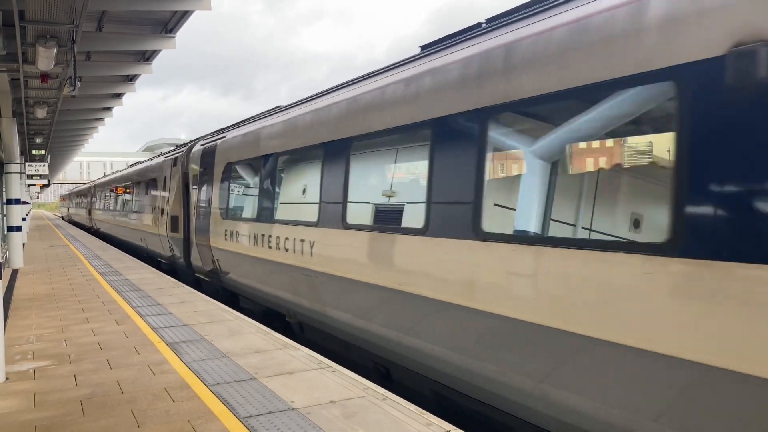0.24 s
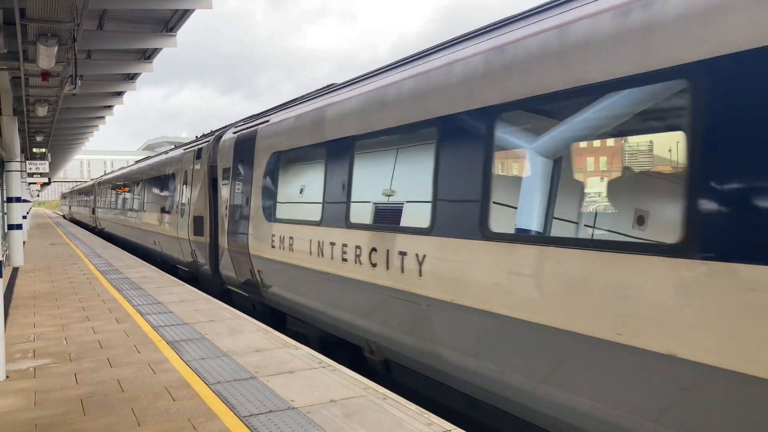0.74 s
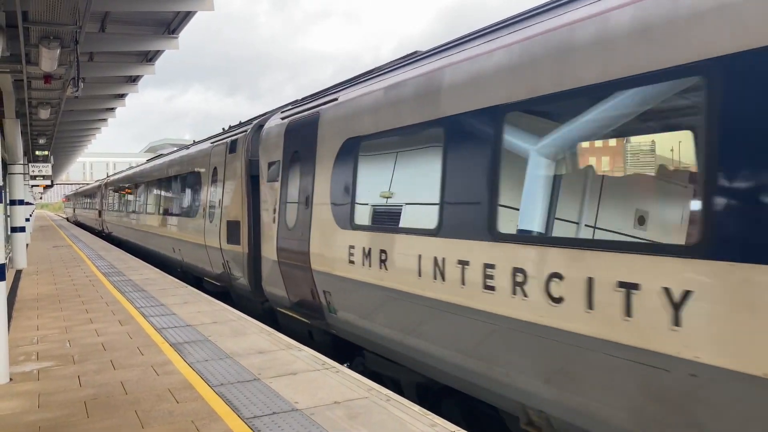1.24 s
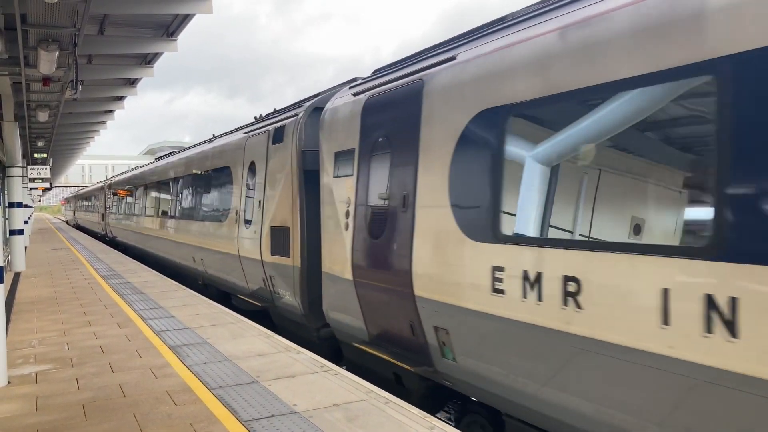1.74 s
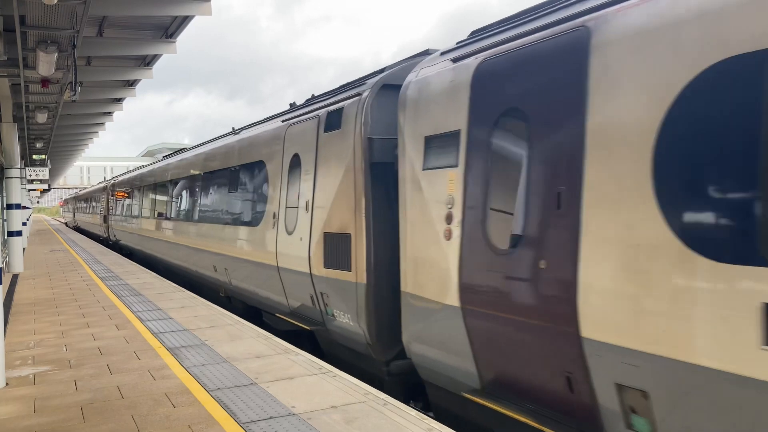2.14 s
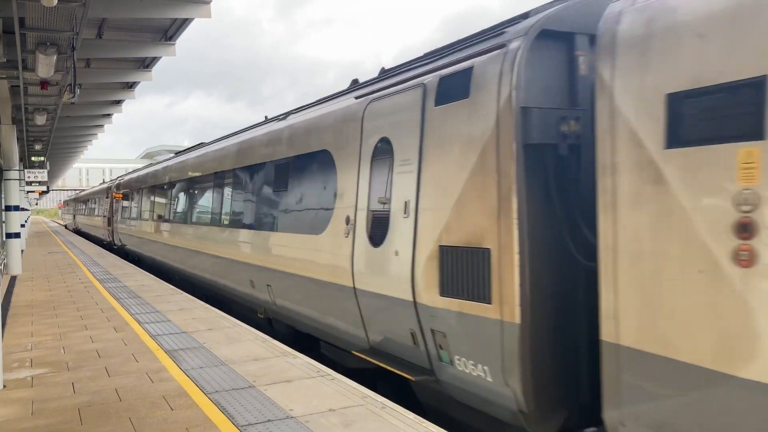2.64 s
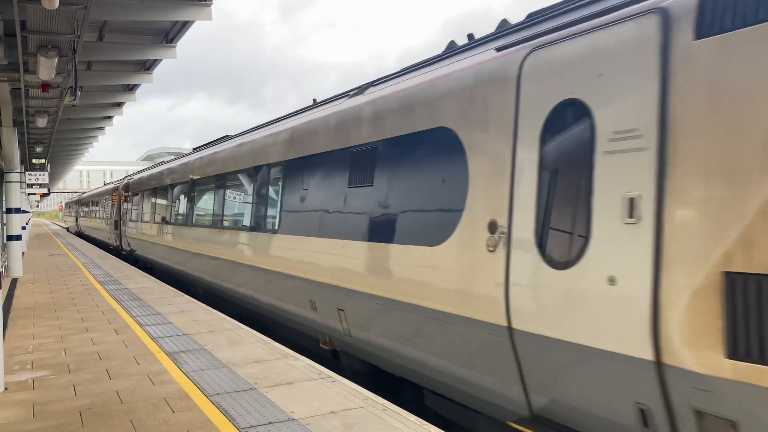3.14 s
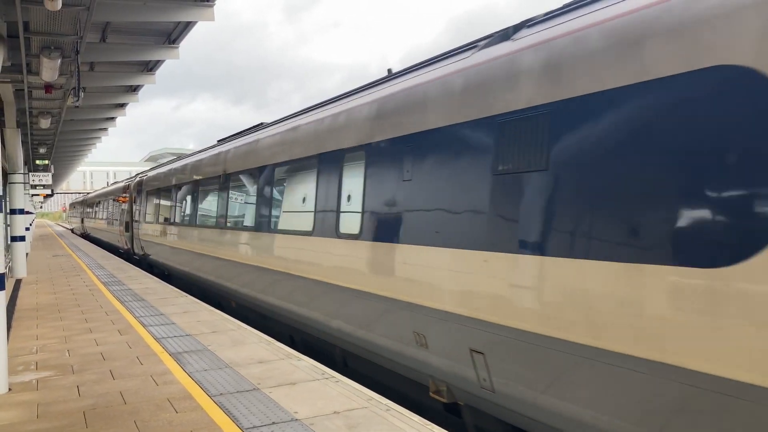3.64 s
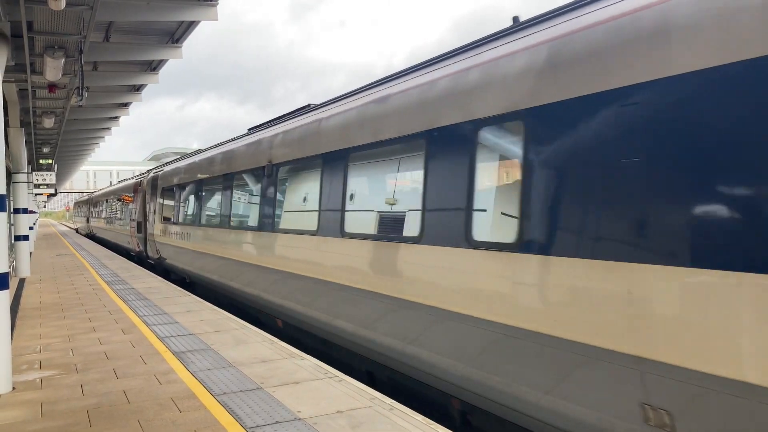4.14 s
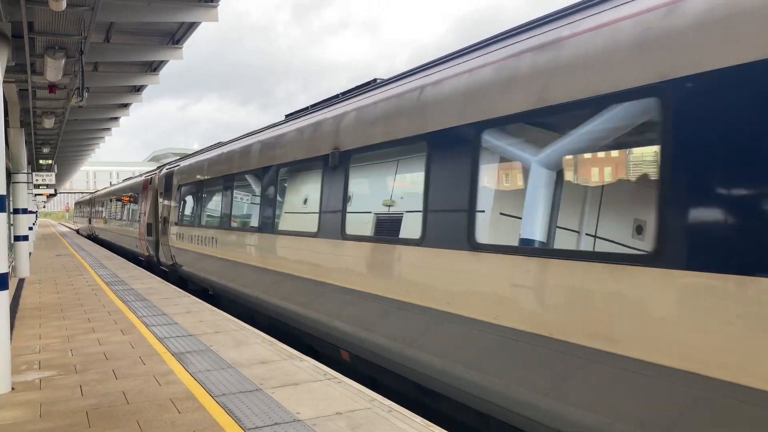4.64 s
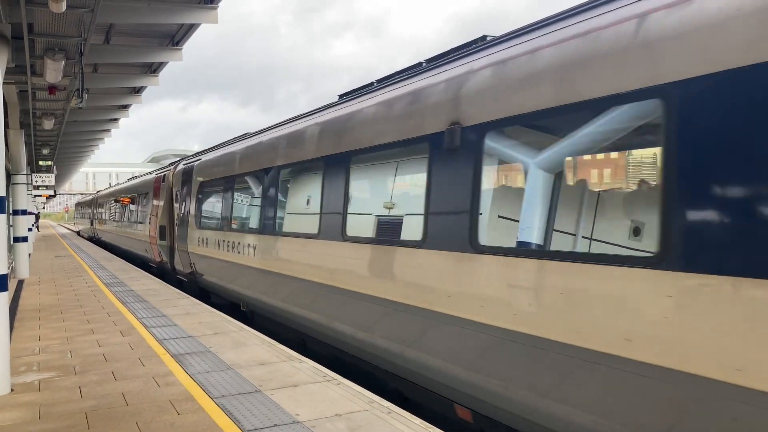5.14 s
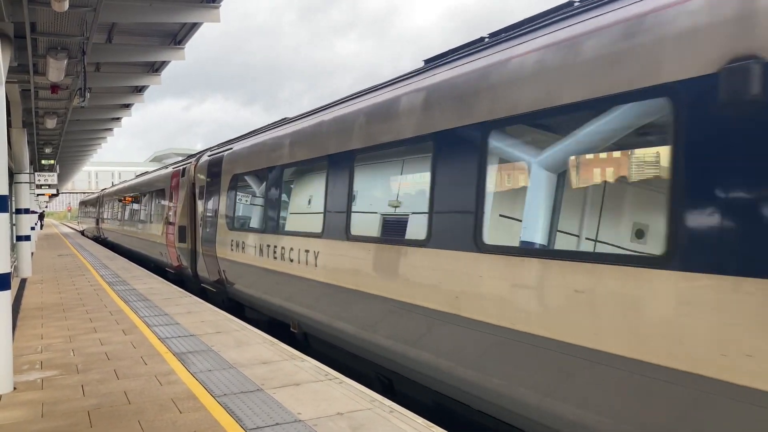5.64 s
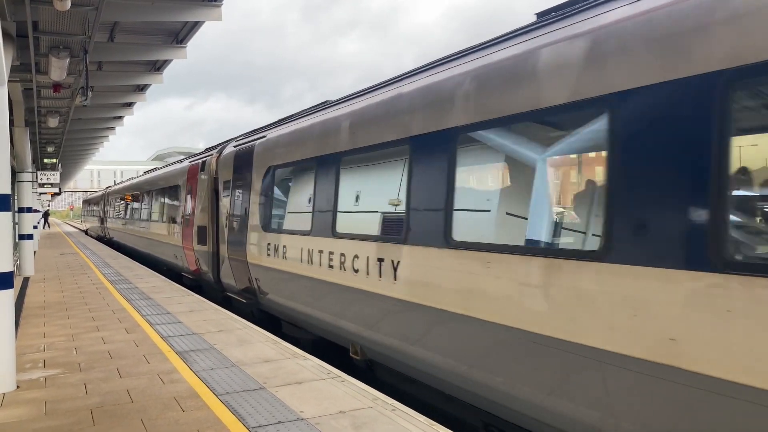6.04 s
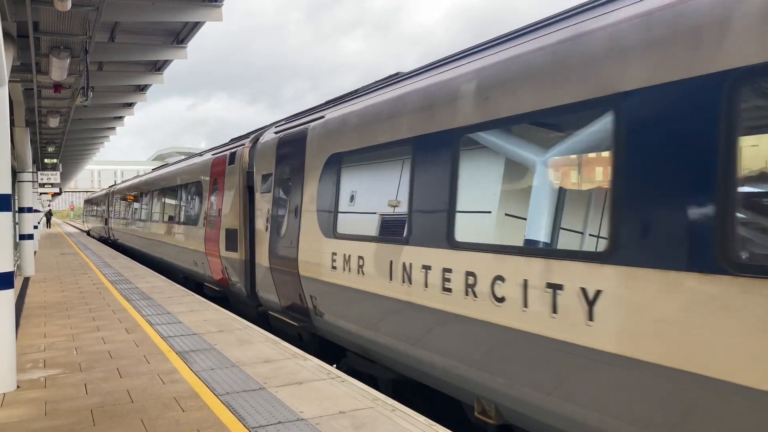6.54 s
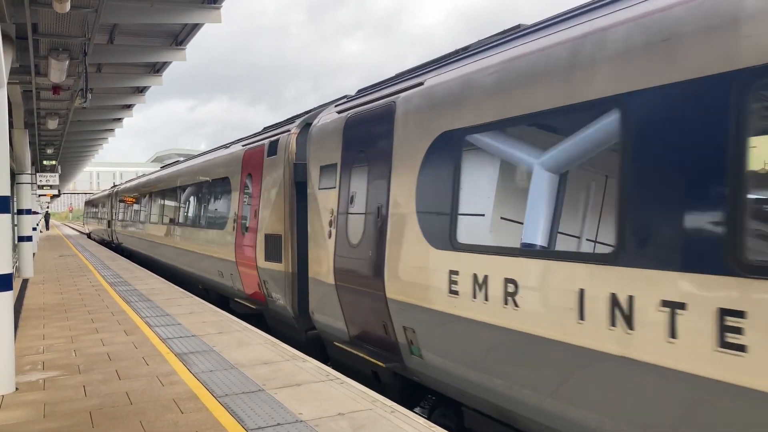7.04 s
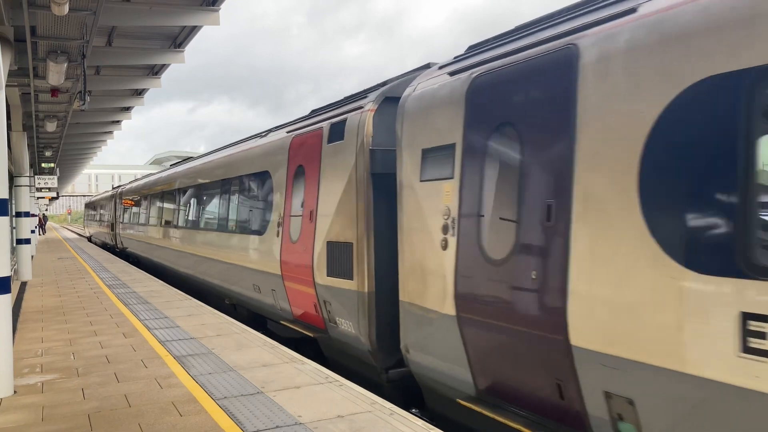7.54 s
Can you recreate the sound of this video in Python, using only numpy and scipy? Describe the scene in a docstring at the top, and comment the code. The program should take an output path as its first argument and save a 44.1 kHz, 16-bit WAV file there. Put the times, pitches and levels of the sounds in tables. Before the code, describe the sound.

A passenger diesel train rolls along a roofed platform, engines droning low and throbbing, then revving up, with wind thumps and metallic wheel knocks.

```python
"""Two diesel engines drone and beat under a roar of fans and rolling wheels, with wind in both microphone ports:
a passenger train rolls slowly along a roofed platform. Engines are sums of shaft-order tones and later rev up.
Roar is noise through underframe resonances, swelling with each car; wind is low noise with gusts and buffets.
Brief hums flutter near 380 Hz; dull clunks are band-passed noise; wheels knock over a rail joint and ring,
with a low noise rumble of rolling wheels between knocks."""
import sys
import numpy as np
from scipy import signal
from scipy.io import wavfile
from scipy.ndimage import uniform_filter1d

SR = 44100
rng = np.random.default_rng(int(sys.argv[2]) if len(sys.argv) > 2 else 0)


def waveform_to_disk(signal):
    """Save audio, clipped to [-1, 1], as 16-bit WAV at the path in sys.argv[1]."""
    frames = np.transpose(np.atleast_2d(signal))
    scaled = np.clip(frames, -1, 1) * 32767
    samples = np.round(scaled).astype(np.int16)
    wavfile.write(sys.argv[1], SR, samples)


N = 342657  # samples

# Engine speed. Each row: time in seconds, shaft speed in turns per second.
SHAFT_SPEED = [(0, 20.2), (.4, 19.75), (.8, 19.05), (2, 19.3), (4.4, 19.25), (4.9, 18.9), (5.25, 19.7),
               (5.6, 21), (6, 22.35), (6.4, 24.2), (6.75, 25.35), (7.05, 25.8), (7.77, 24.9)]
# Firing orders before waver. Each row: time in seconds, second engine's amplitude as a share of the first (0-1),
# first engine's order 3 in dB, its order 6 in dB.
FIRING_ORDERS = [(0.0, 0.8, -18, -21), (0.55, 0.5, -15.5, -16.5), (1.35, 0.92, -17, -27),
                 (1.49, 0.35, -11.5, -28), (1.94, 0.8, -19, -23.5), (2.81, 1, -15, -18.5),
                 (2.93, 0.34, -8, -18), (3.51, 0.33, -17.5, -17.5), (3.9, 0.74, -9, -31),
                 (4.3, 0.53, -12.5, -18), (5.29, 1, -15.5, -25), (5.63, 0.68, -21, -15),
                 (6.36, 0.92, -12, -16), (6.78, 0.46, -19.5, -20), (7.12, 0.66, -29.5, -27),
                 (7.77, 0.63, -20.5, -24)]
# Second engine's lag behind the first. Each row: time in seconds, slip in firing cycles.
ENGINE_SLIP = [(-0.0, -0.21), (0.7, 0.51), (1.67, 1.9), (1.89, 1.95), (2.01, 2.43), (2.33, 3.05),
               (2.53, 3.33), (2.75, 3.27), (3.8, 4.31), (4.09, 4.36), (4.74, 4.55), (4.94, 4.77),
               (5.31, 4.77), (5.74, 5.17), (6.1, 5.28), (6.64, 5.59), (7.3, 6.83), (7.77, 7.53)]
# Other shaft orders before waver. Each row: time in seconds, orders 5, 7, 8 and 9 in dB.
UNEVEN_ORDERS = [(0, -39, -47, -22, -28), (.35, -35, -44, -32, -27.5), (.9, -42, -37, -45, -38),
                 (1.45, -46, -28, -29.5, -34), (1.95, -33, -29, -45, -42), (2.25, -25, -23.5, -31, -31),
                 (2.7, -42.5, -29.5, -38, -40), (3.3, -37, -42, -43, -40), (3.55, -40, -31, -26, -25.5),
                 (3.8, -33, -29, -28.5, -22.5), (4.1, -36, -22.5, -29.5, -22), (4.45, -46, -23, -30, -22.5),
                 (4.6, -47, -23, -38, -28), (4.9, -39, -20.5, -27, -29), (5.03, -38, -20, -21.5, -21),
                 (5.2, -40, -38, -41, -20), (5.38, -40, -36, -39, -21.5), (5.5, -29, -38, -25.5, -30),
                 (5.63, -33, -42, -36, -29), (5.8, -36, -33, -30, -44), (6.9, -36, -40, -39, -47),
                 (7.35, -25, -48, -35, -49), (7.77, -20.5, -26, -49, -44)]
SLIP_6_CYCLES = 0.8  # head start of the beat in order 6
REFERENCE_TURNS_PER_S = 22.7  # mid-rev
ORDER_2_REFERENCE_DB, ORDER_2_DB_PER_TURN = -37.5, 1.3  # level at the reference speed, slope
ORDER_12_RE_9_DB = -16.5
UNEVEN_WAVER_RMS_DB = 1.4

# Roar spectrum, relative. Each row: frequency in Hz, density in dB per Hz.
ROAR_SPECTRUM = [(25, -37), (50, -0.5), (90, -11.5), (140, -7), (200, -14), (260, -15.5), (390, -15.5),
                 (600, -18.5), (850, -19.5), (1130, -20), (3040, -29), (5500, -41), (8300, -49),
                 (11000, -58), (12300, -61), (13300, -82), (15500, -74)]
# Underframe resonances. Each row: frequency in Hz, width in Hz, mean height in dB before scaling by nearness.
UNDERFRAME = [(783, 133, 3.5), (879, 99, 3), (1013, 29, 4.5), (1679, 190, 4.5), (3017, 48, 4)]
# Left-right likeness of the roar. Each row: frequency in Hz, correlation (clipped to -1..1).
ROAR_LIKENESS = [(60, 0.65), (130, 0.69), (270, 0.87), (580, 0.14), (1000, 0.41), (1750, 0.43),
                 (2630, -0.08), (5700, 0.24), (7400, 0.59), (9000, -1.46), (11000, 0.4), (14000, 0)]
# Left-right balance of the roar. Each row: frequency in Hz, left over right in dB.
ROAR_LEAN = [(60, -2.5), (400, -2.5), (1000, -1), (2500, 0), (5500, -2), (8000, -0.5)]
# Port phase of the roar's shared part. Each row: frequency in Hz, lead of the right port in radians.
ROAR_PORT_PHASE = [(300, .1), (600, .7), (1030, .9), (1750, 2.1), (2400, 0), (5000, 0), (5700, 2.9),
                   (7000, .5), (8300, 0)]
# Roar throbbing with the engine. Each row: shaft order, depth (0-1).
ROAR_THROB = [(1, .04), (3, .045)]
# Pass-by of fans and rolling. Values: closest time in seconds, swell in dB, half width in seconds.
FAN_ROLL_PASS = (5.296, 7.62, 1.71)
# Later treble swell. Values: closest time in seconds, swell in dB, half width in seconds, base between cars in dB.
TREBLE_SWELL = (6.5, 7, 1.45, -5.5)
# Bass swell. Values: closest time in seconds, swell in dB, half width in seconds, base between cars in dB.
BASS_SWELL = (6.5, 4.5, 2, -2)
CAR_S, LEAVING_SHARE = 5.52, 0.64  # time per car; half width once past, as a share: it fades faster than it comes
FAR_DB, ROAR_DB_PER_TURN, TREBLE_DB_PER_TURN = -29, -0.01, 0.2
PATCH_RMS_DB = 1.5

# Low noise swells, before waver: wind gusts on the ports and one rumble of rolling wheels.
# Each row: middle in seconds, half length in seconds, level in dB, reach in Hz.
LOW_SWELLS = [(.65, 0.2, -16.5, 50), (1.54, 0.12, -23, 70), (2.3, 0.052, -14, 300),
              (2.43, 0.15, -14.5, 260), (2.433, 0.055, -16.5, 435), (2.787, 0.18, -17, 60),
              (3.35, 0.42, -26.5, 310), (3.698, 0.21, -22, 110), (4.5, 0.5, -20.5, 80.5)]
WIND_GUSTS = LOW_SWELLS[:6] + LOW_SWELLS[7:]
WHEEL_RUMBLE = LOW_SWELLS[6]
# Single buffets. Each row: middle in seconds, level in dB, reach in Hz.
WIND_BUFFETS = [(.755, -19, 200), (.86, -27, 179), (1.291, -7.5, 200), (1.35, -12, 180), (1.52, -17, 150),
                (2.155, -15, 220), (2.34, -14, 300), (2.427, -9, 447), (2.469, -17, 300),
                (2.585, -11.5, 420), (2.75, -9, 150), (4.41, -16, 260)]
CALM_DB, CALM_REACH_HZ = -34.5, 70
LOW_WAVER_RMS_DB = 3.4
LOW_LIKENESS = [(80, 0.88), (400, 0.68)]  # Each row: frequency in Hz, left-right correlation.
LOW_LEAN = [(80, 0.015), (400, 0.3)]  # Each row: frequency in Hz, left over right in dB.

# Short hums. Each row: middle in seconds, pitch in Hz, peak rms in dB before port balance.
HUM_FLUTTERS = [(.505, 390, -22), (.73, 352, -25.5), (.96, 388, -28), (1.4, 386, -27.5), (1.52, 374, -25),
                (1.58, 376, -27.5), (5.27, 380, -33), (6.22, 380, -29), (6.37, 390, -27),
                (6.52, 390, -29.5)]
FLUTTER_HALF_S = 0.028

# Running-gear clunks. Each row: start in seconds, level in dB before rise and decay.
GEAR_CLUNKS = [(2.581, -22), (3.126, -15.5), (5.152, -14)]
CLUNK_HZ, CLUNK_SPREAD_HZ, CLUNK_T60_S = 750, 490, 0.06

# Wheels at the rail joint. Each row: blow in seconds, knock in dB before grain, ring in dB before build-up and decay,
# ring tilt in dB per kHz, rise time in seconds, ring length as a share of the modes' t60.
RAIL_JOINTS = [(2.655, -27.5, -39.5, 0.5, 0.072, 0.83), (3.185, -32.5, -43, -2, 0.12, 1),
               (4.305, -28.5, -42, 1, 0.099, 0.76), (4.815, -33, -60, 0, 0.063, .6),
               (4.855, -32, -40.5, -0.5, 0.045, 0.64)]
# Knock spectrum, relative. Each row: frequency in Hz, density in dB per Hz.
KNOCK_SPECTRUM = [(300, -8), (1500, 5.5), (3500, 2), (6000, -3.5), (8000, -6), (9000, -37), (11000, -13),
                  (13000, -32)]
# Wheel modes. Each row: frequency in Hz, spread in Hz, level relative to the ring in dB, full t60 in seconds.
WHEEL_MODES = [(7980, 150, -1, 0.74), (10120, 210, -3, 0.75), (14100, 150, -13, .15)]
KNOCK_T60_S = 0.38

EDGE_HZ = 15100  # band limit


def amp(db):
    """Decibels to gain."""
    return 10 ** (np.asarray(db) / 20)


def evened(x):
    """Scales to rms 1."""
    return x / np.sqrt(np.mean(x ** 2) + 1e-20)


def read(points, hz):
    """Spectrum table on a log-frequency axis."""
    f, value = np.transpose(points)
    return np.interp(np.log(hz + 1), np.log(f + 1), value)


def curves(table, t):
    """Columns of a time table at times t."""
    s, *columns = np.transpose(table)
    return [np.interp(t, s, c) for c in columns]


def drift(top_hz, t):
    """Random wander of rms 1: sixteen sines up to top_hz, weaker as they quicken."""
    hz = np.geomspace(top_hz / 20, top_hz, num=16)[:, None]
    sines = np.sin(2 * np.pi * (hz * t + rng.random(hz.shape)))
    return evened((sines / np.sqrt(hz)).sum(0))


def patchy(t, hz, hz_bins, frames):
    """Smoothed random map of rms 1 over frequency and time."""
    grid = rng.standard_normal((len(t), len(hz))).T
    return evened(uniform_filter1d(uniform_filter1d(grid, hz_bins, 0), frames, 1))


def level(db, hz):
    """Spectrum in dB to gains whose total power is 1."""
    gain = amp(db)
    return gain / np.sqrt((gain ** 2).sum(0) * hz[1])


def noise(shape, size, likeness, lean, phase=((1, 0),)):
    """Two partly correlated ports of noise; shape(hz, t) is the rms per root Hz over frequency and time."""
    hop = size // 4
    hz = np.fft.rfftfreq(size, 1 / SR)[:, None]
    t = np.arange(N // hop + 5) * hop / SR
    a, b, c, d = rng.standard_normal((len(t), len(hz), 4)).T
    same = np.clip(read(likeness, hz), -1, 1)
    left, other = a + 1j * b, c + 1j * d
    right = same * left * np.exp(1j * read(phase, hz)) + np.sqrt(1 - same ** 2) * other
    half_lean = amp(read(lean, hz) / 2)
    ports = np.array([left * half_lean, right / half_lean])
    return signal.istft(ports * shape(hz, t) * np.sqrt(SR / size), nperseg=size, noverlap=size - hop)[1][:, :N]


def passing(t, s, swell_db, half_s, between_db=0):
    """Level in dB of something that every car carries past."""
    ages = t - s - CAR_S * np.arange(-2, 2)[:, None]
    widths_s = half_s * np.where(ages > 0, LEAVING_SHARE, 1)
    return between_db + (swell_db / (1 + (ages / widths_s) ** 2)).sum(0)


def low_power(hz, reach_hz, db):
    """Power spectrum of low noise that falls off above reach_hz."""
    low_cut_db = 20 * np.log10(1 + ((40 + 0.1 * reach_hz) / (hz + 1)) ** 3)
    colour = level(-4 * (hz / reach_hz) ** 1.8 - 6 * np.log10(hz + 30) - low_cut_db, hz)
    return (colour * amp(db)) ** 2


def engine():
    """Shaft-order tones; two engines' firing orders beat; reflections off train and roof add waver and port spread."""
    t = np.arange(0, N + 64, 64) / SR
    speed, slip = curves(SHAFT_SPEED, t)[0], curves(ENGINE_SLIP, t)[0]
    share, db_3, db_6 = curves(FIRING_ORDERS, t)
    share = np.clip(share, 0, 1)
    # complex sums of both engines: magnitude is the beat
    orders = [(3, amp(db_3) * (1 + share * np.exp(-2j * np.pi * slip))),
              (6, amp(db_6) * (1 + share * np.exp(-2j * np.pi * (2 * slip + SLIP_6_CYCLES))))]
    five, seven, eight, nine = amp(curves(UNEVEN_ORDERS, t))
    two = amp(ORDER_2_REFERENCE_DB + ORDER_2_DB_PER_TURN * (speed - REFERENCE_TURNS_PER_S))
    twelve = amp(ORDER_12_RE_9_DB) * nine
    others = [(2, two), (5, five), (7, seven), (8, eight), (9, nine), (12, twelve)]
    orders += [(k, rms * amp(UNEVEN_WAVER_RMS_DB * drift(5.6, t))) for k, rms in others]
    turns, out = np.cumsum(speed) * 64 / SR, np.zeros((2, N))
    for k, rms in orders:
        # multiples of 3 share the pulse's timing; the rest start anywhere in the cycle
        start = (k % 3 > 0) * rng.random()
        jitter = 0.11 * np.sqrt(k) / 2 * drift(11, t)
        phase = 2 * np.pi * (k * turns + start) + jitter + np.unwrap(np.angle(rms))
        spread = 0.017 * k * drift(2.9, t)
        gain = np.sqrt(2) * abs(rms) * amp(0.32 * np.sqrt(k) * drift(11, t))
        gain, phase, spread = [np.interp(np.arange(N) / 64, np.arange(len(t)), v) for v in (gain, phase, spread)]
        out += gain * np.cos(phase + np.outer([1, -1], spread))
    return out * amp([[-1.1], [1.1]])


def roar():
    """Broad noise through the underframe's resonances, which come and go, in drifting patches."""
    def shape(hz, t):
        revs = curves(SHAFT_SPEED, t)[0] - REFERENCE_TURNS_PER_S
        db = FAR_DB + passing(t, *FAN_ROLL_PASS) + ROAR_DB_PER_TURN * revs
        bass_db = passing(t, *BASS_SWELL)
        treble_db = passing(t, *TREBLE_SWELL) + TREBLE_DB_PER_TURN * revs
        peaks_db = sum((g + 0.81 * drift(9, t)) / (1 + (2 * (hz - f) / w) ** 2) for f, w, g in UNDERFRAME)
        near = 1 + (db + 27.0) / 10  # resonances stand out when the source is close
        tone = amp(read(ROAR_SPECTRUM, hz) + peaks_db * near)
        middle = (hz[:, 0] > 600) & (hz[:, 0] < 2500)
        tone = tone / np.sqrt((tone[middle] ** 2).sum(0) * hz[1])  # unit power in the middle band
        bass = np.clip(np.log2(700 / (hz + 1)), 0, 1)
        treble = np.clip(np.log2((hz + 1) / 2000) / 2, 0, 1)
        chance_db = PATCH_RMS_DB * patchy(t, hz, 5, 12) + 0.5 * drift(4.5, t)
        return tone * amp(db + bass_db * bass + treble_db * treble + chance_db)
    turns = np.cumsum(curves(SHAFT_SPEED, np.arange(N) / SR)[0]) / SR
    throb = 1 + sum(depth * np.cos(2 * np.pi * (k * turns + rng.random())) for k, depth in ROAR_THROB)
    return throb * noise(shape, 2048, ROAR_LIKENESS, ROAR_LEAN, ROAR_PORT_PHASE)


def wind():
    """Lumpy low pressure; gusts swell over the calm, each with its own reach, and single buffets thump over them."""
    def shape(hz, t):
        power = low_power(hz, CALM_REACH_HZ, CALM_DB)
        for s, half_s, db, reach_hz in WIND_GUSTS:
            power = power + low_power(hz, reach_hz, db) * np.exp(-((t - s) / half_s) ** 2)
        power = power * amp(LOW_WAVER_RMS_DB * drift(40, t)) ** 2
        for s, db, reach_hz in WIND_BUFFETS:
            power += low_power(hz, reach_hz, db) * np.exp(-((t - s) / 0.0043) ** 2)
        return np.sqrt(power)
    return noise(shape, 1024, LOW_LIKENESS, LOW_LEAN)


def flutters():
    """Each flutter is a soft sine blip under a bell-shaped envelope."""
    out = np.zeros(N)
    for s, hz, db in HUM_FLUTTERS:
        at = np.arange(round((s - 0.1) * SR), round((s + 0.1) * SR))
        bell = np.exp(-((at / SR - s) / FLUTTER_HALF_S) ** 2)
        out[at] += np.sqrt(2) * amp(db) * bell * np.cos(2 * np.pi * (hz * at / SR + rng.random()))
    return out * amp([[-1], [1]])


def clunks():
    """Each clunk is a sudden dull blow of band-passed noise that dies at once."""
    t, out = np.arange(4096) / SR, np.zeros((2, N))
    edges_hz = [CLUNK_HZ - CLUNK_SPREAD_HZ / 2, CLUNK_HZ + CLUNK_SPREAD_HZ / 2]
    band = signal.butter(3, edges_hz, "band", fs=SR, output="sos")
    rise = np.sin(np.pi / 2 * np.minimum(t / 0.0037, 1)) ** 2
    for s, db in GEAR_CLUNKS:
        both, left, right = rng.standard_normal((3, len(t)))
        blow = evened(signal.sosfilt(band, both + 0.5 * np.array([left, right])))
        out[:, round(s * SR):][:, :len(t)] += blow * rise * amp(db - 60 * t / CLUNK_T60_S)
    return out


def joints():
    """Each knock swells as the wheel climbs the rail end, then echoes away; wheel modes ring on as fuzzy clusters."""
    def shape(hz, t):
        power = 0
        for s, knock_db, ring_db, tilt_db, rise_s, ring_share in RAIL_JOINTS:
            rise = np.clip(1 + (t - s) / rise_s, 0, 1) ** 3
            age = np.maximum(t - s, 0)
            # uneven scrape of steel on steel
            grain = amp(1.1 * rng.standard_normal(len(t)) + 2.5 * patchy(t, hz, 14, 5))
            knock = level(read(KNOCK_SPECTRUM, hz), hz) * grain * amp(knock_db - 60 * age / KNOCK_T60_S)
            power = power + rise * knock ** 2
            build = rise ** 2 * np.clip(0.22 + (t - s) / 0.047, 0, 1)  # the ring grows after the blow
            for f, w, db, t60_s in WHEEL_MODES:
                mode = level(-20 * np.log10(1 + (2 * (hz - f) / w) ** 2), hz)
                mode_db = ring_db + db + tilt_db * (f - WHEEL_MODES[0][0]) / 1000
                power = power + build * (mode * amp(mode_db - 60 * age / (ring_share * t60_s))) ** 2
        return np.sqrt(power)
    return noise(shape, 512, [(1000, 0.7), (10000, -0.26), (14000, -0.5)], [(1000, 0.01)])


def rumble():
    """Rolling wheels between knocks: one wavering swell of low noise."""
    def shape(hz, t):
        s, half_s, db, reach_hz = WHEEL_RUMBLE
        power = low_power(hz, reach_hz, db) * np.exp(-((t - s) / half_s) ** 2)
        return np.sqrt(power) * amp(LOW_WAVER_RMS_DB * drift(40, t))
    return noise(shape, 1024, LOW_LIKENESS, LOW_LEAN)


def scene():
    """All sources at the two ports."""
    return engine() + roar() + wind() + flutters() + clunks() + joints() + rumble()


def record(dry):
    """Microphone bass roll-off, soft ceiling of the recorder, then the band limit."""
    thin = signal.sosfilt(signal.butter(2, 36, "high", fs=SR, output="sos"), dry)
    soft = np.tanh(thin / 1.2) * 1.2
    low_pass = signal.firwin(511, EDGE_HZ, window=("kaiser", 9), fs=SR)
    return signal.oaconvolve(soft, low_pass[None], "same")


dry = scene()
out = record(dry)
waveform_to_disk(out)
```